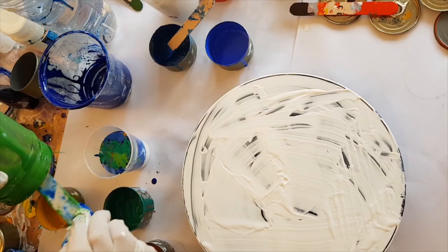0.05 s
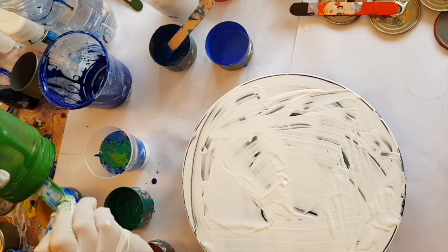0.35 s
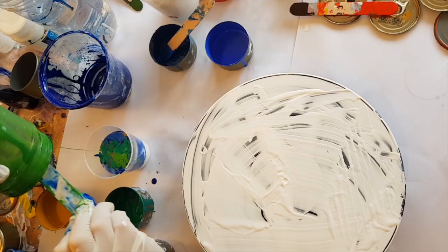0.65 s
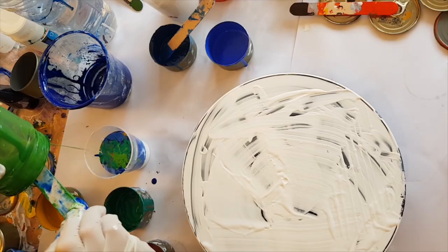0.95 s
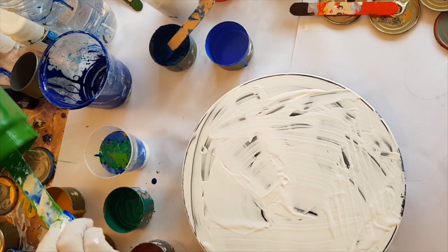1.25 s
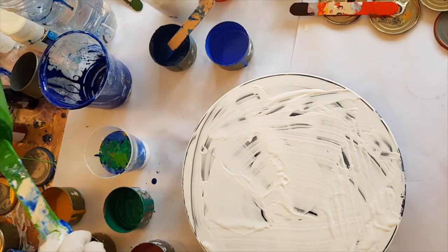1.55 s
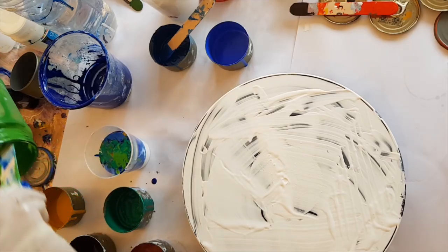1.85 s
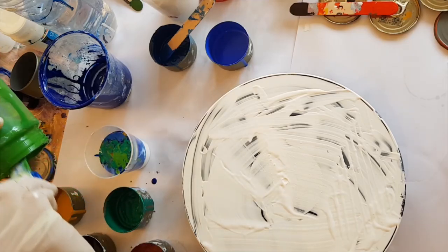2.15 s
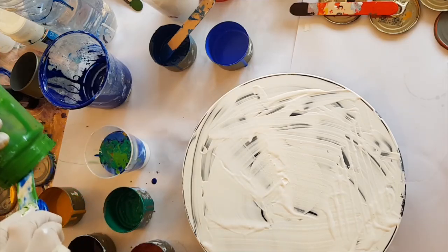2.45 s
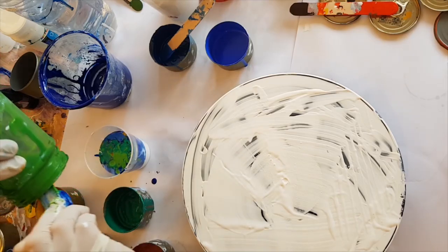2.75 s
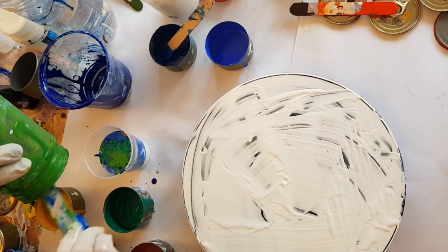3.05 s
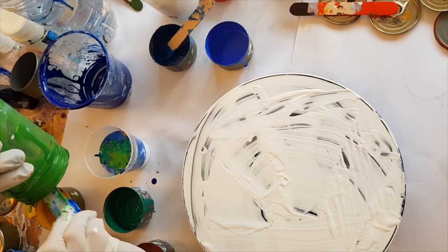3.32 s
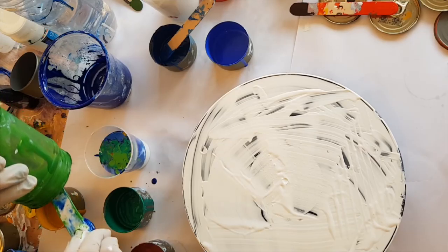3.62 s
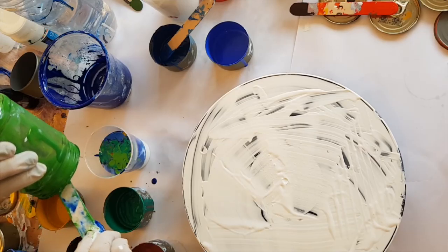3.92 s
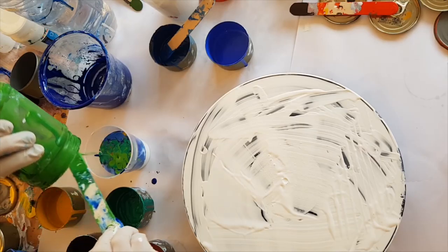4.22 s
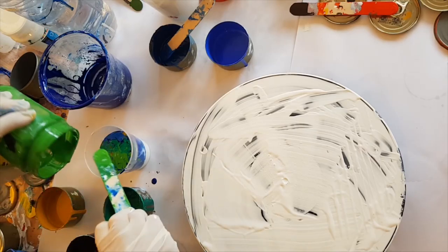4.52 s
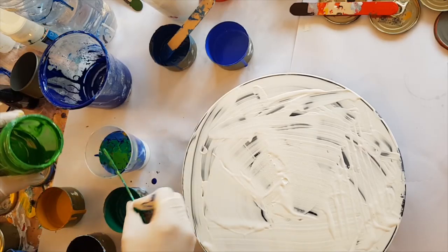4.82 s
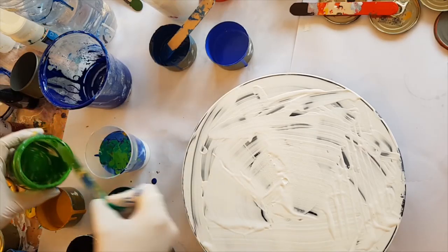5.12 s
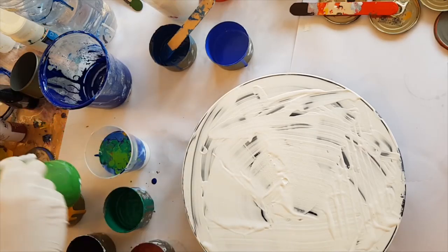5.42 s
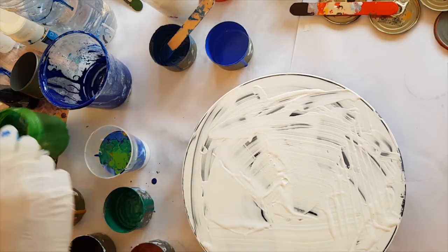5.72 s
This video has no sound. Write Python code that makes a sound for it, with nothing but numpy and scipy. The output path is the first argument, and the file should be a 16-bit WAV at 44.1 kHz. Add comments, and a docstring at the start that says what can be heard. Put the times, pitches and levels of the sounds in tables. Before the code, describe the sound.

A wooden stick scrapes paint out of a plastic bottle in short, soft, wet strokes, tapping the wall with a brief hollow ring. Gloved hands rumble, rustle and faintly squeak on the plastic, and the table thuds softly. Then sleeves brush, and the stick knocks loudly on the bottle's base and bounces. The work is close and slightly left of the microphone, in a small room with a faint hum and hiss.

```python
"""Close on a craft table in a small room, the work just left of the microphone, over a faint hum and hiss.
For four seconds a wooden stick scrapes paint out of a plastic bottle, rubbing and tapping the wall into
ringing. Gloved hands rumble, rustle and faintly squeak on the plastic, and the table thuds softly.
Then sleeves brush as the arms lift the bottle. Near five and a half seconds the stick knocks on its base,
the loudest sound, and bounces."""
import sys
import numpy as np
from scipy import signal
from scipy.fft import rfft, irfft
from scipy.io import wavfile

SR = 44100
rng = np.random.default_rng(int(sys.argv[2]) if len(sys.argv) > 2 else 0)


def wav_out(sig):
    """Save sig, one row per channel (or a flat mono array), as 16-bit PCM at SR to the path in sys.argv[1]."""
    wavfile.write(sys.argv[1], SR, np.round(np.clip(np.atleast_2d(sig).T, -1, 1) * 32767).astype(np.int16))


N = 258867

# room noise spectrum: (frequency [Hz], level [dB])
AIR_SPECTRUM = [(15, -53), (26, -0.5), (69, -4.5), (156, -5.5), (240, -15), (1110, -23.5), (1950, -29.5),
                (9300, -36.5), (10600, -32), (15500, -31.5)]
# hum and thin whine: (frequency [Hz], level [dB])
HUM_TONES = [(72, -1.5), (145, -10), (10341, -32)]
# the hum sinks and returns: (time [s], level [dB])
HUM_LEVEL = [(0, -58), (2.3, -67.5), (4.4, -64.5), (4.8, -59.5), (5.87, -56.5)]
# noise at the microphone pair: (frequency [Hz], left-right correlation [0-1])
CORRELATION = [(30, 1), (125, 0.86), (300, 0.89), (700, 0.65), (2000, 0.025), (15000, 0.015)]
# the bottle sits to the left: (frequency [Hz], left boost and right cut [dB])
LEFT_BIAS = [(700, 0.5), (2000, 2), (5000, 2), (12000, 1)]
# reflections off the table and near walls: (left delay [s], right delay [s], level [dB])
NEAR_ECHOES = [(.0047, .0048, -10), (.0185, .0186, -14), (.03, .0301, -10)]
# room tail: (frequency [Hz], time to fall 60 dB [s])
ROOM_DECAY = [(300, 0.2), (800, 0.21), (2500, 0.22), (6000, 0.22), (14000, 0.21)]

# steady rumble of the held bottle: (time [s], level [dB])
GRIP_LEVEL = [(0, -58), (1.2, -65), (2.4, -66), (3.4, -62.5), (4.2, -77), (5.87, -64)]
# the hands shift their grip: (time [s], length [s], rumble [dB], rustle [dB])
GRIP_SHIFTS = [(.085, 0.039, -53, -60), (.14, 0.052, -43.5, -73), (.27, 0.016, -52, -55.5),
               (.42, 0.036, -46.5, -66.5), (.69, 0.098, -48.5, -76), (.96, .1, -50.5, -72.5),
               (1.1, 0.24, -59, -61.5), (1.26, 0.14, -56.5, -62.5), (1.57, 0.13, -53, -82),
               (1.91, 0.091, -59, -71), (2.21, 0.13, -59.5, -61.5), (2.84, 0.27, -63, -70),
               (4.29, 0.37, -79, -67.5), (5.33, 0.044, -62, -70)]
# the two colours of handling: (frequency [Hz], level [dB])
RUMBLE_SPECTRUM = [(13, -32), (22, -23), (36, 2), (54, 8.5), (83, -5.5), (114, -11), (146, -9.5),
                   (172, -14), (260, -23), (340, -43), (570, -120)]
RUSTLE_SPECTRUM = [(110, -21), (180, -7.5), (293, -7.5), (373, -2.5), (482, -6.5), (663, -12),
                   (1500, -28.5), (1950, -36), (3300, -120)]
# short low thuds, on the table and beneath the base knocks: (time [s], frequency [Hz], level [dB])
LOW_THUDS = [(0.289, 168.4, -52.5), (0.701, 137, -42.5), (1.02, 182, -49.5), (3.24, 194, -53),
             (3.929, 140, -57), (5.472, 240, -56.5), (5.663, 293, -55)]
# sleeve movements: (time [s], length [s], soft [dB], crisp [dB], hiss [dB])
SLEEVE_BRUSHES = [(4.45, 0.095, -62, -60, -68), (4.56, 0.13, -67, -74, -73),
                  (4.655, 0.078, -50.5, -51, -69.5), (5.137, 0.1, -62.5, -57.5, -67.5),
                  (5.32, 0.091, -76, -93, -78)]
# the three colours of cloth: (frequency [Hz], level [dB])
CLOTH_SOFT = [(59, -49), (100, -2), (249, 1.5), (284, -11), (314, 3), (361, -4), (1100, -9.5), (1430, -46),
              (2420, -120)]
CLOTH_CRISP = [(900, -16), (1150, -3.5), (1500, 0.5), (1850, -2.5), (2200, -1), (3000, -3.5), (3700, -13.5)]
CLOTH_HISS = [(3500, 3.5), (4500, -3), (6000, -6), (8500, -12)]
# faint high squeaks of rubbing on the plastic: (time [s], length [s], pitch [Hz], level [dB])
RUB_SQUEAKS = [(0.527, .13, 3030, -75), (0.563, 0.1, 5540, -71), (0.94, 0.06, 3650, -75),
               (2.09, 0.072, 8200, -80.5), (2.784, 0.067, 3640, -78), (3.13, 0.046, 7900, -71),
               (3.393, 0.038, 7950, -72)]

# the stick drags along the wall: (time [s], length [s], body [dB], rasp [dB], wet hiss [dB])
WALL_SCRAPES = [(.09, 0.18, -62.5, -74.5, -78.5), (.36, 0.034, -64, -70, -75),
                (.52, 0.16, -73.5, -70.5, -72), (1.14, 0.076, -84, -76, -77), (1.25, 0.074, -63, -68, -73),
                (1.89, 0.07, -56.5, -63, -68), (2.46, 0.081, -56.5, -63, -67), (3.1, 0.022, -57, -80, -78),
                (3.14, 0.039, -57, -62, -70.5), (3.31, 0.025, -62, -71, -72),
                (3.76, 0.045, -67.5, -78, -99), (5.3, 0.08, -83, -82, -70)]
# the stick's rasp and the wet paint's hiss: (frequency [Hz], level [dB])
RASP_SPECTRUM = [(1200, -12), (1700, -7), (2200, 3.5), (2600, 0.5), (3200, 1.5), (3800, -0.5), (4600, -15)]
WET_SPECTRUM = [(2650, -14), (4500, 4), (4880, 10.5), (5880, 3), (7520, 11.5), (8620, 7), (9390, 3),
                (12600, 3.5), (15000, -3)]
# bottle resonances: (frequency [Hz], time to fall 60 dB [s], wall weight [dB], base weight [dB])
BOTTLE_MODES = [(575, 0.15, -3, -38), (620.9, 0.11, -3.5, -2), (656, 0.089, 1, -12), (705, 0.044, 0.5, -30),
                (753, 0.089, -2.5, -5), (826, 0.034, -2, 4), (866, 0.2, -14.5, 7.5), (950, 0.08, -6.5, -8),
                (1077, 0.081, -6, -11.5), (1213, 0.031, -28, -3), (1530, 0.013, -15.5, 3),
                (1610, 0.063, -5.5, -16), (1930, 0.026, -30, -34), (2118, 0.039, -0.5, -7.5),
                (2184, 0.09, -1, -10), (2795, 0.023, 5, -25), (3240, 0.031, 0.5, -10),
                (3720, .03, -26, -25), (4920, 0.053, -3, -5), (5960, 0.036, -1.5, -9),
                (6360, 0.024, 1.5, -10), (6940, .015, -3, -25)]
# a blow's body, clack, tick and snap bands: (low edge [Hz], high edge [Hz])
BLOW_BANDS = [(450, 1100), (1100, 3000), (3000, 7000), (7000, 15500)]
# the stick taps wall and rim, then knocks on the base:
# (time [s], body [dB], clack [dB], tick [dB], snap [dB], place [0 wall - 1 base], stick note [Hz])
WALL_TAPS = [(.145, -48.5, -60, -82, -83, 0.057, 730), (0.288, -50.5, -56.5, -55, -64.5, 0.37, 5080),
             (0.702, -45, -45, -51, -52.5, 0.0, 2280), (1.903, -66.5, -65.5, -81, -70, 0.44, 1930),
             (1.952, -57, -55.5, -61.5, -69, 0.35, 3130), (2.294, -50, -57, -68, -84, 0.066, 2750),
             (2.388, -52.5, -71, -78, -80, 0.0046, 784), (2.407, -49.5, -54.5, -69, -72, 0.65, 1050),
             (3.098, -51, -62.5, -82, -81, 0.16, 645), (3.237, -40, -43.5, -46, -64.5, 0.31, 3010),
             (3.491, -51.5, -59.5, -65, -67.5, 0.098, 2570), (3.926, -65, -65.5, -76, -99, 0.78, 980),
             (5.38, -45.5, -47.5, -49.5, -58.5, 0.79, 1404),
             (5.641, -44.5, -60.5, -52.5, -49.5, 0.71, 5700)]
BASE_KNOCKS = [(5.459, -44, -69, -74, -80, .3, 850), (5.472, -16.5, -25, -39.5, -50.5, 0.89, 2194),
               (5.543, -23, -41.5, -50, -57.5, 1, 3810), (5.745, -50.5, -63.5, -82, -74, 0.59, 880),
               (5.794, -36, -64, -56, -55.5, 0.87, 3340), (5.8, -34.5, -42, -59, -63, 0.97, 2120),
               (5.855, -41.5, -57, -64, -67, 0.89, 2150)]

CUTOFF_HZ, RIGHT_LAG_S = 15750, .00023
SCRAPE_ATTACK_S, SCRAPE_RELEASE_S = 0.032, 0.45


def from_db(db):
    """Decibels to gain."""
    return 10 ** (np.asarray(db) / 20)


def rms_one(x):
    """Scale to unit power."""
    return x / np.sqrt(np.mean(x ** 2) + 1e-20)


def at_hz(points, hz):
    """Read a table on a log-frequency axis."""
    f, value = np.transpose(points)
    return np.interp(np.log(hz), np.log(f), value)


def band(x, low, high, order=2):
    """Causal band-pass."""
    return signal.sosfilt(signal.butter(order, [low, min(high, .48 * SR)], "band", fs=SR, output="sos"), x)


def curve(rows):
    """Gain over time from (time [s], level [dB])."""
    return from_db(np.interp(np.arange(N) / SR, *np.transpose(rows)))


def envelope(start_s, length_s, attack_s, release_s):
    """A movement rises smoothly, holds to the end of its length and falls 60 dB in release_s."""
    age = np.arange(N) / SR - start_s
    rise = np.sin(np.pi / 2 * np.clip(age / attack_s, 0, 1)) ** 2
    return rise * from_db(-60 * np.maximum(age - length_s, 0) / release_s)


def strokes(rows, attack_s, release_s):
    """One gain curve per level column of (time [s], length [s], level [dB], ...); rows add in power."""
    return np.sqrt(sum((from_db(levels_db)[:, None] * envelope(s, length, attack_s, release_s)) ** 2
                       for s, length, *levels_db in rows))


def grain(per_s, depth_db):
    """A quick random flutter of level."""
    t = np.arange(N) / SR
    return rms_one(from_db(depth_db * np.interp(t * per_s, np.arange(N), rng.standard_normal(N))))


def lean_left(db):
    """Channel gains for a source left of the microphone."""
    return from_db([[db], [-db]])


def noise(spectrum):
    """Coloured stereo noise from the left, alike in the bass and unrelated in the treble."""
    hz = np.maximum(np.fft.rfftfreq(N, 1 / SR), 1)
    skirts = (np.minimum(hz / spectrum[0][0], 1) * np.minimum(spectrum[-1][0] / hz, 1)) ** 6
    alike = np.clip(at_hz(CORRELATION, hz), 0, 1)
    mid, side = rfft(rng.standard_normal((2, N)))
    pair = np.sqrt(1 + alike) * mid + np.sqrt(1 - alike) * side * [[1], [-1]]
    pair = pair * lean_left(0.43) * np.exp(-2j * np.pi * hz * RIGHT_LAG_S * [[0], [1]])
    return rms_one(irfft(pair * from_db(at_hz(spectrum, hz)) * skirts, N))


def room_tone(hum_db=-0.5, air_db=-63.5):
    """A faint wavering hum with a thin whine, over steady room noise."""
    t = np.arange(N) / SR
    tones = sum(from_db(db) * np.sqrt(2) * np.sin(2 * np.pi * (hz * t + rng.random()))
                for hz, db in HUM_TONES)
    hum = from_db(hum_db) * curve(HUM_LEVEL) * tones * grain(per_s=33, depth_db=-5.0)
    return hum + from_db(air_db) * noise(AIR_SPECTRUM)


def room_response(t, tail_db, build_s=0.001):
    """Bottle to microphone: direct sound, left first, then dull near echoes and a diffuse tail."""
    edges = np.geomspace(150, 16000, 9)
    tail, echoes = 0, np.zeros((2, len(t)))
    for low, high in zip(edges, edges[1:]):
        t60 = at_hz(ROOM_DECAY, np.sqrt(low * high))
        tail = tail + band(rng.standard_normal((2, len(t))), low, high) * from_db(-60 * t / t60)
    tail = rms_one(tail * np.clip(t / build_s, 0, 1)) / np.sqrt(len(t))
    for left, right, db in NEAR_ECHOES:
        echoes[[0, 1], [round(left * SR), round(right * SR)]] = from_db(db)
    out = band(echoes, 200, 1800, order=1) + from_db(tail_db) * tail
    out[[0, 1], [0, round(RIGHT_LAG_S * SR)]] += 1   # direct sound
    return out


def handling(rumble_db=-2.0, rustle_db=-3, thud_db=-9, thud_hold_s=0.0091, grip_rustle_db=-14):
    """Gloved hands hold and shift the bottle: a dull rumble and a soft rustle, with a thud at every tap."""
    rumble, rustle = strokes(GRIP_SHIFTS, attack_s=0.018, release_s=0.46)
    jolts = [(s, thud_hold_s, body_db + thud_db) for s, body_db, *_ in WALL_TAPS]
    thud, = strokes(jolts, attack_s=0.0022, release_s=0.32)
    grip = curve(GRIP_LEVEL)
    rumble = from_db(rumble_db) * np.hypot(rumble, grip)
    rustle = from_db(rustle_db) * np.hypot(np.hypot(rustle, thud), from_db(grip_rustle_db) * grip)
    return rumble * noise(RUMBLE_SPECTRUM) + rustle * noise(RUSTLE_SPECTRUM)


def low_thuds(t60=0.11):
    """Short low thuds, most together with a tap or knock; each is one damped tone."""
    t, out = np.arange(N) / SR, np.zeros(N)
    for s, hz, db in LOW_THUDS:
        age = np.maximum(t - s, 0)
        out += np.sin(2 * np.pi * hz * age) * from_db(db - 60 * age / t60)
    return out


def sleeves(soft_db=3.0, hiss_db=2.5):
    """Cloth brushes, catching and slipping, as the arms lift the bottle."""
    soft, crisp, hiss = strokes(SLEEVE_BRUSHES, attack_s=0.038, release_s=0.37)
    cloth = from_db(soft_db) * soft * noise(CLOTH_SOFT) + crisp * noise(CLOTH_CRISP)
    cloth += from_db(hiss_db) * hiss * noise(CLOTH_HISS)
    return cloth * grain(per_s=250, depth_db=-1.0)


def rub_squeaks(half_width=0.087):
    """A glove rubs the plastic bottle: faint, high squeaks, each a narrow band of friction noise."""
    out = np.zeros((2, N))
    for s, length, hz, db in RUB_SQUEAKS:
        rub = rms_one(band(rng.standard_normal((2, N)), hz * (1 - half_width), hz * (1 + half_width)))
        out += from_db(db) * rub * envelope(s, length, SCRAPE_ATTACK_S, SCRAPE_RELEASE_S)
    return out * lean_left(0.5)


def bottle_ring(t, place, scatter_db, crack_db, crack_t60=0.004):
    """One contact: a short dull crack and the modes, whose mix depends on where the stick lands."""
    hz, t60, wall_db, base_db = np.transpose(BOTTLE_MODES)[:, :, None]
    strength = from_db(wall_db * (2.0 - place) + base_db * place + scatter_db * rng.standard_normal(hz.shape))
    modes = np.sum(strength * np.sin(2 * np.pi * hz * t) * from_db(-60 * t / t60), axis=0)
    crack = rms_one(band(rng.standard_normal(len(t)), 900, 5000, order=1))
    return modes + from_db(crack_db) * crack * from_db(-60 * t / crack_t60)


def scraping(body_db=-0.5, rasp_db=-6.0, wet_db=1.0):
    """Dense slips ring the bottle's wall; wet paint hisses under the stick."""
    body, rasp, wet = strokes(WALL_SCRAPES, SCRAPE_ATTACK_S, SCRAPE_RELEASE_S)
    slips = noise([(300, 0), (1500, 0)]) * grain(per_s=220, depth_db=-1.0)
    wall = bottle_ring(np.arange(SR // 4) / SR, place=0.33, scatter_db=0.98, crack_db=6.9)
    hollow = rms_one(band(signal.fftconvolve(slips, wall[None])[:, :N], 570, 1800))
    hiss = from_db(rasp_db) * rasp * noise(RASP_SPECTRUM) + from_db(wet_db) * wet * noise(WET_SPECTRUM)
    hiss *= grain(per_s=1100, depth_db=1.0)
    return (from_db(body_db) * body * hollow + hiss) * lean_left(1.1)


def colour_blow(x, levels_db):
    """Hardness of contact: tilt a blow toward the given attack level in each band, then lean it left."""
    hz = np.maximum(np.fft.rfftfreq(x.shape[1], 1 / SR), 1)
    centres = [np.sqrt(low * high) for low, high in BLOW_BANDS]
    for _ in range(3):
        attack = x[:, :round(.017 * SR)]
        attack_db = 20 * np.log10([np.std(band(attack, low, high, order=4)) for low, high in BLOW_BANDS])
        tilt = list(zip(centres, levels_db - attack_db))
        x = irfft(rfft(x) * from_db(at_hz(tilt, hz)))
    return irfft(rfft(x) * from_db(at_hz(LEFT_BIAS, hz) * [[1], [-1]]))


def stick_blows(rows, scatter_db, crack_db, stick_db, tail_db, lowest_hz, stick_t60=0.022):
    """Each blow rings bottle and stick into the room; the stick's free length sets its note."""
    t, out = np.arange(SR // 2) / SR, np.zeros((2, N + SR))
    lead = round(.002 * SR)
    for s, *levels_db, place, stick_hz in rows:
        stick = np.sin(2 * np.pi * stick_hz * t) * from_db(stick_db - 60 * t / stick_t60)
        ringing = bottle_ring(t, place, scatter_db, crack_db) + stick
        ringing = band(ringing, lowest_hz, CUTOFF_HZ, order=10)   # small bodies radiate no bass
        at_mic = signal.fftconvolve(room_response(t, tail_db), np.pad(ringing, (lead, 0))[None])
        start = round(s * SR) - lead
        out[:, start:start + len(t)] += colour_blow(at_mic[:, :len(t)], np.array(levels_db))
    return out[:, :N]


def scene():
    """Everything the microphone hears at the table."""
    taps = stick_blows(WALL_TAPS, scatter_db=2, crack_db=17, stick_db=6.5, tail_db=0, lowest_hz=558)
    knocks = stick_blows(BASE_KNOCKS, scatter_db=.8, crack_db=12.5, stick_db=0.5, tail_db=-3, lowest_hz=605)
    contacts = taps + knocks + low_thuds()
    return contacts + scraping() + rub_squeaks() + sleeves() + handling() + room_tone()


def record(dry):
    """The highest treble is cut steeply."""
    return signal.sosfilt(signal.ellip(12, .1, 90, CUTOFF_HZ, fs=SR, output="sos"), dry)


dry = scene()
out = record(dry)
wav_out(out)
```